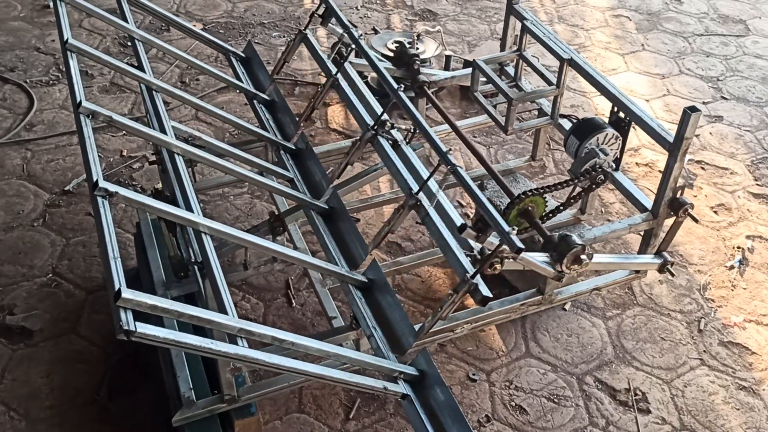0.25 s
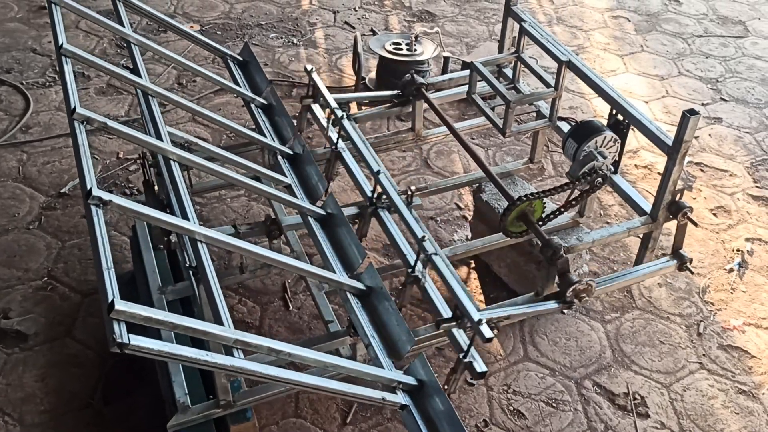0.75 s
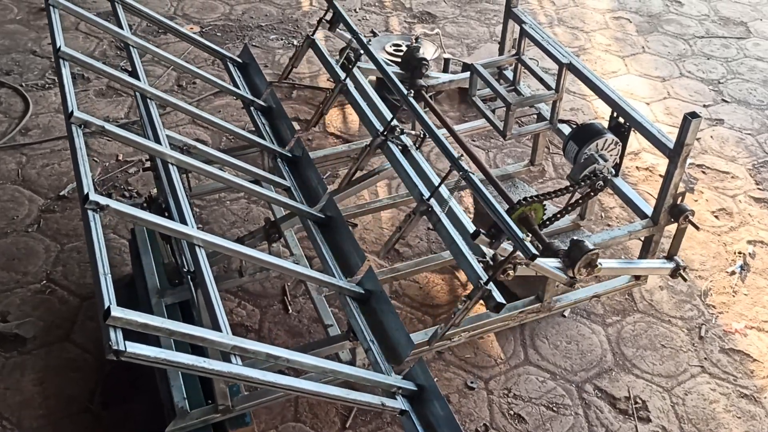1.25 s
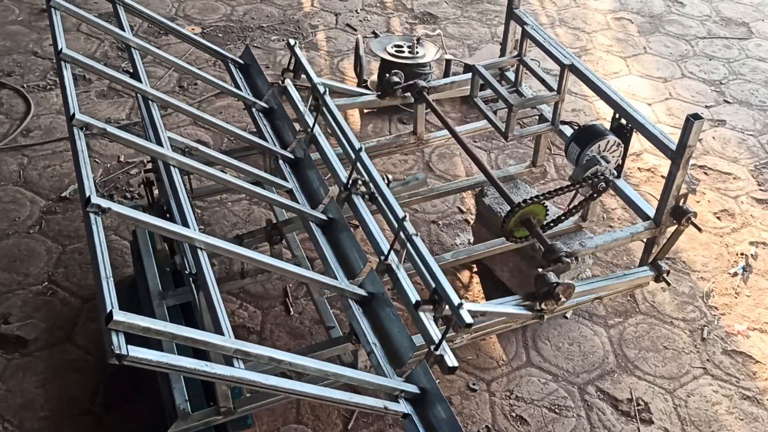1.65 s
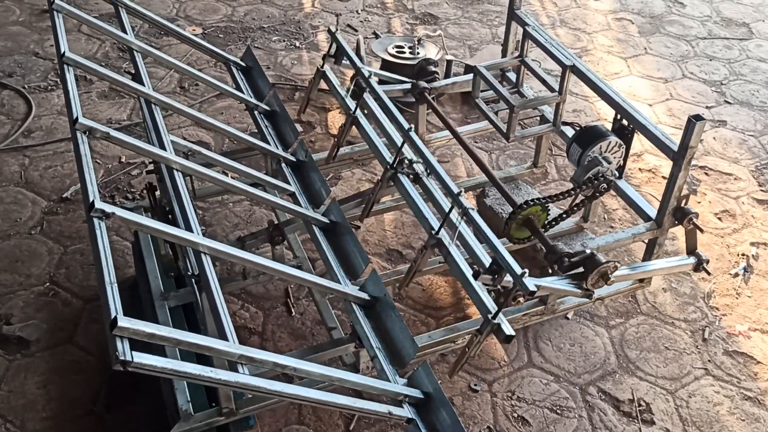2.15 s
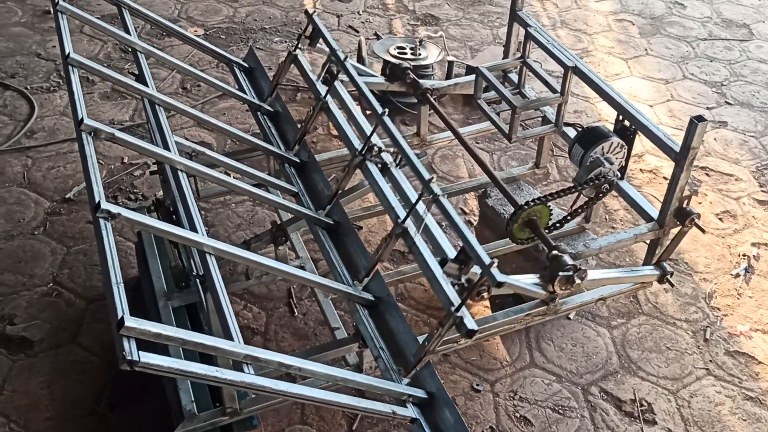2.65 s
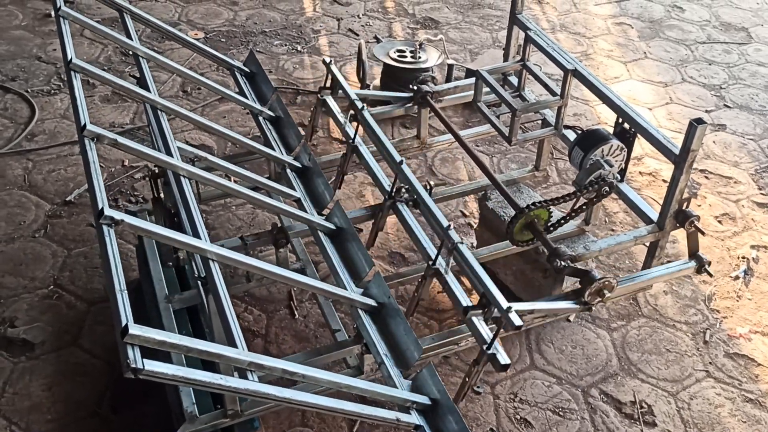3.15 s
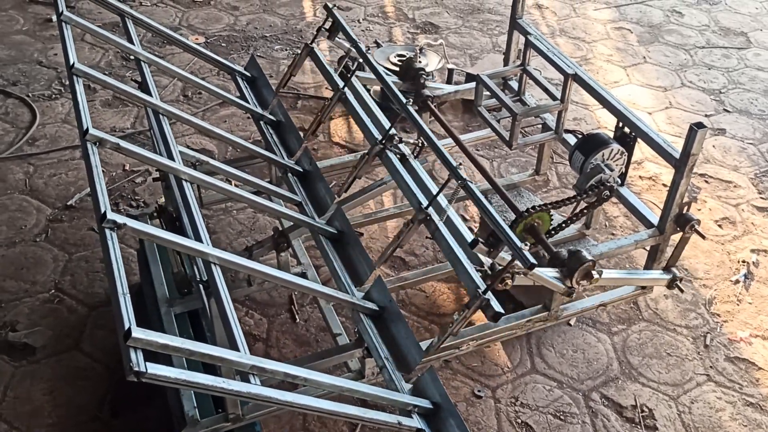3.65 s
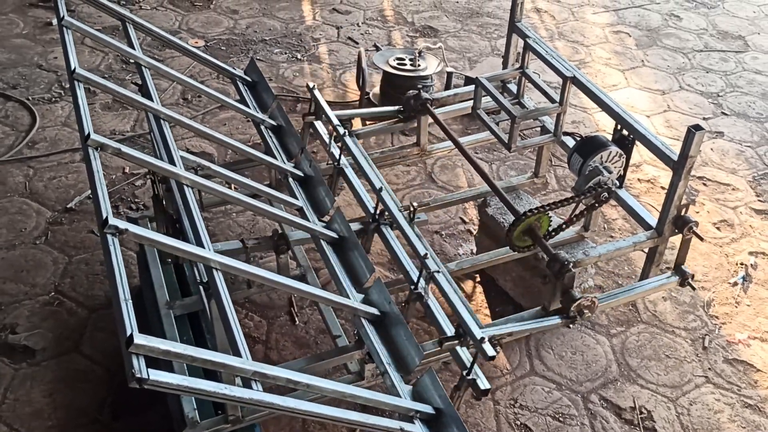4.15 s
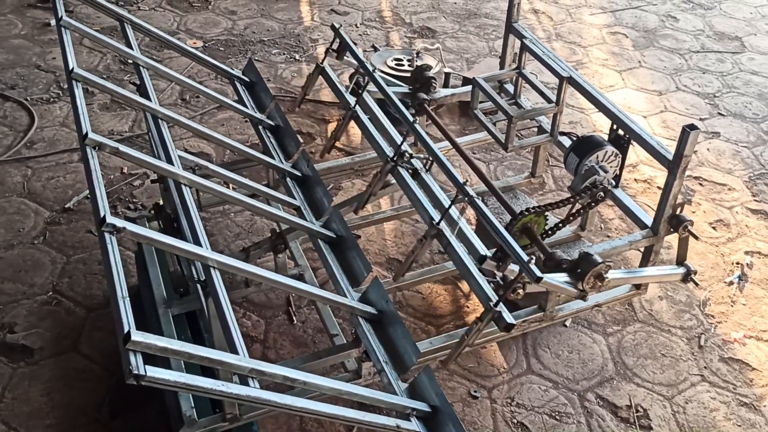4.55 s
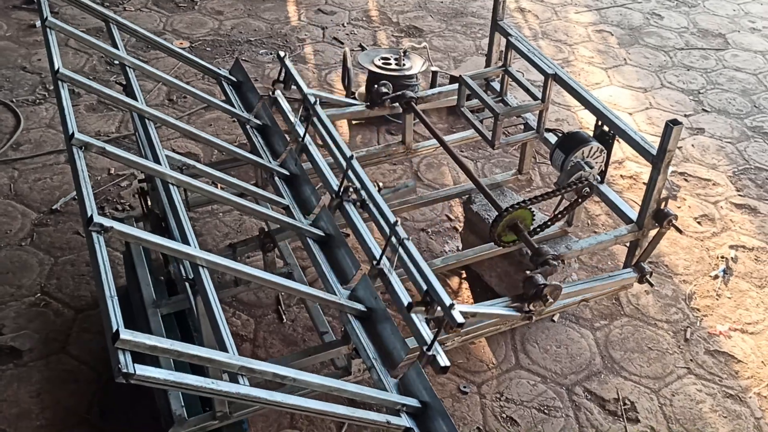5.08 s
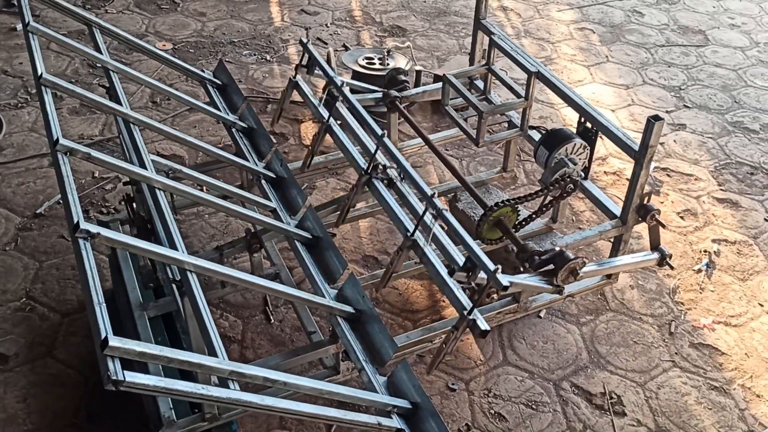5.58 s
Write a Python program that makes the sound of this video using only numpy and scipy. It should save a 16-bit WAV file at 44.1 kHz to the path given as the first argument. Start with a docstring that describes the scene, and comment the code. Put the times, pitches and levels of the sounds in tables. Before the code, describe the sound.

A homemade steel-tube machine runs in a yard, heard close in wide stereo with little echo, bright but without the very highest treble. The stretch opens on quiet working noise: faint motor whirr and hum, chain ticks, and a dull linkage knock near 0.1 s. At about 0.5 s the carriage slams into the frame, a chattering clank with two fast rebounds and ringing bars; at 0.75 s it drops back with a hard knock and weakening, jingling bounces. The pair repeats at about 1.65 and 1.9, 2.8 and 3.05, 3.95 and 4.2, 5.1 and 5.35 s, slightly varied. Around each drop the chain rattles and a rail rubs; afterwards a thin, rough squeak sinks in pitch while slowing chain ticks follow. Two soft linkage knocks come near 1.25, 2.4, 3.5, 4.7 and 5.8 s. Small stray clinks and occasional shudders keep it loose and uneven.

```python
"""A steel-tube carriage clanks against the frame of a homemade planting machine, once a turn, in a yard.
A motor and chain crank it to and fro; each time it then drops back with a jingling rattle.
Loose joints clink and knock, the chain ticks over its sprocket, a pivot squeaks, a rail rubs, a motor hums faintly.
Blows are sprays of tiny contacts that excite coloured, dying noise and clear, wavering tones.
The chain is bunched clicks, the squeak a rough gliding tone, the rub and the motor's whirr coloured noise."""
import sys
import numpy as np
from scipy import signal
from scipy.fft import rfft, irfft
from scipy.io import wavfile

SR = 44100
rng = np.random.default_rng(int(sys.argv[2]) if len(sys.argv) > 2 else 0)


def bounce(signal):
    """Save signal as a 16-bit WAV file at the path given by the first command-line argument."""
    frames = np.transpose(np.atleast_2d(signal))
    limited = np.clip(frames, -1, 1)
    pcm = np.round(limited * 32767).astype(np.int16)
    wavfile.write(sys.argv[1], SR, pcm)


N = 256662
TIME = np.arange(N) / SR
RING_TIME = TIME[:SR]  # every ring lasts at most one second

# how alike the two microphones hear each pitch: (pitch_hz, left_right_correlation [-1 to 1])
LIKENESS = [(40, 0.2), (120, .93), (400, 0.86), (1000, .5), (1550, 0.12), (2150, 0), (2800, -0.04),
            (3600, 0.24), (4300, 0), (14000, 0.11)]
# tone colour of the chain's many weak resonances: (pitch_hz, relative_level_db)
CHAIN_COLOUR = [(200, -11), (1000, -12), (1750, -4), (2600, -5.5), (3750, -4), (4600, -3.5), (5500, -6.5),
                (6500, -0.5), (7050, 0), (7420, 8), (7850, 0), (8400, 3), (12000, -13.5), (16000, -20)]


def from_db(db):
    """Turn decibels into gain."""
    return 10 ** (np.asarray(db) / 20)


def rms_one(x):
    """Scale a signal to an rms (average strength) of 1."""
    return x / np.sqrt(np.mean(x ** 2) + 1e-20)


def at_hz(points, hz):
    """Read a table between its points, on a log-frequency axis."""
    freq, value = np.transpose(points)
    return np.interp(np.log(np.maximum(hz, 1)), np.log(freq), value)


def drift(rate_hz):
    """Random wander with an rms of 1; a higher rate makes it quicker."""
    coarse = TIME[::64]
    hz = np.fft.rfftfreq(len(coarse), coarse[1])
    spectrum = rfft(rng.standard_normal(len(coarse)))
    slow = irfft(spectrum / (1 + (hz / rate_hz) ** 2), len(coarse))
    return np.interp(TIME, coarse, rms_one(slow))


def noise(colour, size):
    """Coloured noise as two microphones hear it: mostly alike in the bass, nearly unrelated in the treble."""
    hz = np.fft.rfftfreq(size, 1 / SR)
    mid, side = np.exp(2j * np.pi * rng.random((2, len(hz))))
    alike = np.clip(at_hz(LIKENESS, hz), -1, 1)
    pair = np.sqrt(1 + alike) * mid + np.sqrt(1 - alike) * side * [[1], [-1]]
    return rms_one(irfft(pair * from_db(at_hz(colour, hz)), size))


def dying(t60):
    """Envelope that falls 60 dB in t60 seconds."""
    return np.exp(-np.log(1000) * RING_TIME / t60)


def crowd(colour, t60, crack_db, crack_t60):
    """Response of countless close modes (resonances): a short crack and a longer dense ring."""
    envelope = dying(t60) + from_db(crack_db) * dying(crack_t60)
    return noise(colour, size=SR) * envelope


def chatter(length_s, chatter_db):
    """One contact, then a dying spray of tiny rebounds, scaled to unit energy."""
    t = TIME[:SR // 5]
    contacts = rng.random(len(t)) < 900 / SR  # 900 a second on average
    spray = rng.standard_normal(len(t)) * contacts * np.exp(-t / max(length_s, .002))
    force = from_db(chatter_db) * spray / np.sqrt(np.sum(spray ** 2) + 1e-12)
    force[0] = 1
    return force / np.sqrt(np.sum(force ** 2))


def add(out, start_s, sound):
    """Mix a sound in at its start time."""
    at = max(round(start_s * SR), 0)
    out[:, at:at + sound.shape[1]] += sound[:, :N - at]


def blows(events, colour, t60, crack_db, crack_t60, chatter_db):
    """Chattering blows excite a steel part's crowd of modes; part of its ring is the same every time."""
    same = .55  # share of the ring's energy that every blow has in common
    usual = crowd(colour, t60, crack_db, crack_t60)
    out = np.zeros((2, N))
    for start_s, level_db, chatter_s in events:
        fresh = crowd(colour, t60, crack_db, crack_t60)
        response = np.sqrt(same) * usual + np.sqrt(1 - same) * fresh
        force = chatter(chatter_s, chatter_db)
        sound = signal.fftconvolve(response, force[None], axes=1)[:, :SR]
        add(out, start_s, from_db(level_db) * sound)
    return out


def ring(events, modes, swell_s, looseness, flutter_db):
    """Clear modes store each blow's energy; rattling joints shake phase and strength, low modes least."""
    start_s, level_db, _ = np.transpose(events)
    energy_in, out = np.zeros(N), np.zeros((2, N))
    at = np.clip(np.round(start_s * SR).astype(int), 0, N - 1)
    energy_in[at] = from_db(level_db) ** 2
    rise = np.exp(-1 / (swell_s * SR))
    sway = drift(3.7)  # as the parts move, the phase between the microphones wanders
    for hz, mode_db, t60 in modes:
        energy = signal.lfilter([1], [1, -dying(t60)[1] ** 2], energy_in + 1e-18)
        strength = signal.lfilter([1 - rise], [1, -rise], np.sqrt(energy))
        shaken = np.tanh(drift(32)) * min(np.sqrt(hz / 1000), 1)
        swing = strength * from_db(mode_db + flutter_db * shaken)
        # looseness is the phase shake in radians at 1000 Hz
        phase = 2 * np.pi * hz * TIME + looseness * np.sqrt(hz / 1000) * drift(30)
        apart = np.arccos(np.clip(at_hz(LIKENESS, hz), -1, 1)) * sway * rng.choice([-1, 1])
        out += swing * np.sin(phase + apart * [[.5], [-.5]])
    return out


def each_turn(times, contacts):
    """Play a run of contacts from each time, varied a little: rows (start_s, level_db, chatter_s)."""
    scatter_db, scatter_share = 0.6, .012  # spread of the level, and of the delay as a share of itself
    delay_s, level_db, chatter_s = np.transpose(contacts)
    chance = rng.standard_normal((len(times), 2, len(delay_s)))
    runs = []
    for start_s, (late, hard) in zip(times, chance):
        when_s = start_s + delay_s * (1 + scatter_share * late)
        runs.append(np.column_stack([when_s, level_db + scatter_db * hard, chatter_s]))
    rows = np.vstack(runs)
    return rows[(rows[:, 0] >= 0) & (rows[:, 0] < TIME[-1])]


def slowing_run(first_db, loss_db, gap_s, growth_s, chatter_s, count):
    """Contacts ever weaker, their gaps widening by growth_s: rows (delay_s, level_db, chatter_s)."""
    return [(k * gap_s + k * (k - 1) / 2 * growth_s, first_db - k * loss_db, chatter_s) for k in range(count)]


def swells(into_turn, rows):
    """Level in dB of a part that swells and fades at set places in the turn."""
    gain = sum(from_db(db) * np.exp(-((into_turn - middle) / width) ** 2) for middle, width, db in rows)
    return 20 * np.log10(gain + 1e-6)


def push(times):
    """The carriage slams into the frame; blows ring the frame, and the long bars swell a moment later."""
    # a slam and two rebounds: (delay_s, relative_level_db, chatter_s)
    push_contacts = [(0, -3.7, .014), (.018, -9, .014), (.046, -7.3, .023)]
    # the frame's crowd of weaker modes: (pitch_hz, relative_level_db)
    frame_colour = [(40, -66), (110, -19.5), (480, -9.5), (800, -4.5), (1100, 0), (1700, 1), (2400, -3),
                    (3900, 2), (5600, -2.5), (6600, 4.5), (8300, 0.5), (12000, -14.5), (16000, -17)]
    # clear modes of the frame: (pitch_hz, relative_level_db, t60_s)
    frame_modes = [(112, -15, .5), (298, -15, .4), (565, -12, .5), (785, -9, .4), (958, -3.5, .48),
                   (1103, -7, .4), (1260, -3, .42), (1295, -6, .4), (1610, -6, .4), (1672, -1, .38),
                   (2116, 0, .34), (2150, -7, .33), (3543, 5, .27), (5199, -4, .35), (6187, -2, .4),
                   (6845, -2, .4), (7251, -2, .4)]
    # long bars that take up the push and sing on: (pitch_hz, relative_level_db, t60_s)
    bar_modes = [(4431, 0, .45), (4480, -6, .4), (4525, -3, .45), (4600, 0, .5)]
    hits = each_turn(times, push_contacts)
    clank = blows(hits, frame_colour, t60=0.47, crack_db=2.5, crack_t60=0.059, chatter_db=0)
    frame = ring(hits, frame_modes, swell_s=.004, looseness=0.75, flutter_db=6.0)
    bars = ring(hits, bar_modes, swell_s=0.014, looseness=0.45, flutter_db=7.0)
    return from_db(-12.3) * clank + from_db(-25) * frame + from_db(-22.7) * bars


def drop(times, losses_db):
    """The carriage knocks hard on its end stop, then rings through ever weaker bounces."""
    # in some turns it shudders as it settles: (start_s, relative_level_db, chatter_s)
    shudders = [(0.878, -19, .05), (2.032, -20.5, .012), (3.124, -18.5, .012), (3.212, -22, .009),
                (5.449, -17, .07)]
    # hard knock of the end stop: (pitch_hz, relative_level_db)
    stop_colour = [(150, -20), (320, 1), (600, -45), (1700, -20), (2080, 19), (2330, -2), (2650, 16.5),
                   (3200, -20), (8000, -10)]
    # the carriage's crowd of weaker modes: (pitch_hz, relative_level_db)
    carriage_colour = [(40, -51), (110, -14.5), (320, -9), (550, -11.5), (1100, 0), (1700, -0.5),
                       (3100, -0.5), (3750, -0.5), (4200, -1), (5500, -1.5), (6700, 6), (8300, -1.5),
                       (12000, -18), (16000, -18.5)]
    # clear modes of the carriage: (pitch_hz, relative_level_db, t60_s)
    carriage_modes = [(120, -17, .7), (260, -17, .3), (322, -5, .4), (705, -11, .5), (1190, -9, .5),
                      (1715, -1, .5), (3590, -5, .55), (3663, -1, .65), (3743, -2, .65), (3840, -8, .7),
                      (4600, -4, .5)]
    drop_db = -11.5  # before each layer's own gain
    landings = each_turn(times, [(0, drop_db, .008)])
    runs = []
    for start_s, loss_db in zip(times, losses_db):
        bounces = slowing_run(drop_db, loss_db, gap_s=.038, growth_s=.008, chatter_s=.04, count=3)
        runs.append(each_turn([start_s], bounces))
    hits = np.vstack(runs + [shudders])
    knock = blows(landings, stop_colour, t60=0.13, crack_db=-14, crack_t60=0.016, chatter_db=-5.5)
    clank = blows(hits, carriage_colour, t60=0.44, crack_db=-6, crack_t60=0.046, chatter_db=3)
    singing = ring(hits, carriage_modes, swell_s=0.0035, looseness=1.1, flutter_db=9.5)
    return from_db(-5.5) * knock + from_db(-3.9) * clank + from_db(-19) * singing


def joints(drop_times, slack_times, knocks_db):
    """Small steel links clink brightly; the linkage knocks twice, duller, as it takes up its slack."""
    # links stir just before each landing and jingle after it: (delay_s, relative_level_db, chatter_s)
    jingle = [(-.006, -19, .006), (.008, -8, .01), (.017, -12, .012)]
    # a loose link falls over between push and drop: (start_s, relative_level_db, chatter_s)
    stray_clinks = [(0.6725, -11, .004), (1.857, -15, .006), (1.864, -12, .005), (2.902, -17, .003),
                    (4.0454, -16, .007), (5.248, -12.5, .014)]
    # crowd of modes of the small links: (pitch_hz, relative_level_db)
    link_colour = [(100, -38), (1500, -13.5), (3000, -19), (4300, -10.5), (5700, -12.5), (6400, 5.5),
                   (7400, 0), (8400, -1.5), (12000, -17), (13700, -9), (16000, -30)]
    # clear modes of the small links: (pitch_hz, relative_level_db, t60_s)
    link_modes = [(6303, 0, .3), (6365, -1, .3), (6640, -2, .25), (6805, 1, .3), (7251, -2, .3),
                  (7545, -1, .35), (8100, -4, .25)]
    # crowd of modes of the linkage: (pitch_hz, relative_level_db)
    linkage_colour = [(50, -20), (200, -17.5), (500, -1), (850, 1.5), (1700, 5), (2500, -10), (3700, 4),
                      (5500, -12), (7000, 7.5), (15000, -100)]
    links = np.vstack([each_turn(drop_times, jingle), stray_clinks])
    runs = []
    for start_s, knock_db in zip(slack_times, knocks_db):
        pair = slowing_run(knock_db, loss_db=5, gap_s=.083, growth_s=0, chatter_s=.014, count=2)
        runs.append(each_turn([start_s], pair))
    slack = np.vstack(runs)
    clinks = blows(links, link_colour, t60=0.32, crack_db=9.5, crack_t60=0.068, chatter_db=3.5)
    singing = ring(links, link_modes, swell_s=.001, looseness=.6, flutter_db=4)
    knocks = blows(slack, linkage_colour, t60=0.5, crack_db=-1.5, crack_t60=0.032, chatter_db=1)
    return from_db(-12) * clinks + from_db(-27) * singing + from_db(-7.5) * knocks


def chain_ticks(starts):
    """The loaded chain ticks over the teeth, slowing on the return stroke; now and then it snaps taut."""
    # sharp ticks as slack is taken up: (start_s, relative_level_db, chatter_s)
    snap_events = [(0.108, -22.5, .004), (0.2513, -27, .003), (1.115, -19, .004), (1.386, -24.5, .002),
                   (1.446, -30, .005), (3.511, -21.5, .004), (4.557, -24.5, .004), (4.685, -23, .004),
                   (4.821, -25, .004), (4.885, -27, .004)]
    run = slowing_run(first_db=-22.5, loss_db=.7, gap_s=.051, growth_s=.0038, chatter_s=.004, count=6)
    teeth = np.array(run)
    teeth[::2, 1] -= 2.5  # inner links are softer than outer ones, in dB
    return_strokes = starts + .452
    ticks = np.vstack([each_turn(return_strokes, teeth), snap_events])
    sound = blows(ticks, CHAIN_COLOUR, t60=0.25, crack_db=6.5, crack_t60=0.03, chatter_db=0)
    return from_db(-11.5) * sound


def chain_rattle(into_turn, bunching, contacts_per_s):
    """Rollers rattle in a bunch each time a link seats on the sprocket, eighteen links a second."""
    # where in the turn the chain is heard: (middle_s, half_width_s, level_db)
    chain_swells = [(.35, .06, -31), (.53, .06, -40), (.71, .06, -32.5), (1.02, .09, -41.5)]
    link = 18 * into_turn - .22
    seating = np.exp(bunching * np.cos(2 * np.pi * link))
    clicks = rng.uniform(-1.14, 1, N) * (rng.random(N) < contacts_per_s / SR)
    force = rms_one(clicks * seating) * from_db(swells(into_turn, chain_swells))
    body = crowd(CHAIN_COLOUR, t60=0.11, crack_db=5.5, crack_t60=0.0092)
    body = body / np.sqrt(np.sum(body ** 2) / 2)  # unit energy per side, on average
    return signal.fftconvolve(force[None], body, axes=1)[:, :N]


def squeak(into_turn, waver_hz, octave_below_db):
    """A dry pivot sings a thin, rough, sinking note; uneven slips add the octave below."""
    # the note sinks as the pivot slows: (into_turn_s, pitch_hz)
    squeak_pitch = [(.5, 7530), (.6, 7240), (.68, 7110), (.76, 6850)]
    # where in the turn the pivot sings: (middle_s, half_width_s, relative_level_db)
    squeak_swells = [(.635, .06, -34)]
    hz = np.interp(into_turn, *np.transpose(squeak_pitch)) + waver_hz * drift(90.3)
    phase = 2 * np.pi * np.cumsum(hz) / SR
    sides = []
    for side in range(2):
        note = drift(70) * np.sin(phase) + drift(70) * np.cos(phase)
        octave_below = drift(110) * np.sin(phase / 2 + 3 * drift(40))
        sides.append(note + from_db(octave_below_db) * octave_below)
    return from_db(swells(into_turn, squeak_swells)) * np.array(sides)


def rub(into_turn, flutter_db):
    """A rail rubs at set places in the turn: coloured noise with a fluttering level."""
    # tone colour of the rubbing: (pitch_hz, relative_level_db)
    rub_colour = [(500, -11.5), (2400, -12), (3400, -2.5), (4250, -0.5), (5300, -8.5), (6500, -1.5),
                  (8000, -4.5), (14000, -41)]
    # where in the turn the rail rubs: (middle_s, half_width_s, level_db before the flutter)
    rub_swells = [(.3, .075, -30), (.6, .1, -44), (1.03, .045, -38.5)]
    level_db = swells(into_turn, rub_swells) + flutter_db * drift(50)
    return noise(rub_colour, size=N) * from_db(level_db)


def motor(whirr_db, flutter_db, hum_db):
    """Motor and gears: a noisy whirr with a fine flutter, and a few wavering tones."""
    # tone colour of the whirr: (pitch_hz, relative_level_db)
    motor_colour = [(30, -33), (70, -5), (130, -3), (345, 1), (473, -5), (700, -2), (1700, -5), (2400, -9),
                    (3700, -5.5), (4500, -8), (5500, -20.5), (6550, -2), (8400, -21), (12000, -23),
                    (16000, -36)]
    # faint wavering tones of motor and gearing: (pitch_hz, relative_level_db)
    motor_tones = [(75, -74), (118, -61.5), (156, -62), (689, -64), (834, -61.5)]
    whirr = noise(motor_colour, size=N) * from_db(whirr_db + flutter_db * drift(31))
    hum = np.zeros(N)
    for hz, tone_db in motor_tones:
        strength = from_db(tone_db + 2 * drift(2))
        hum += strength * np.sin(2 * np.pi * hz * TIME + 2 * drift(2))
    return whirr + from_db(hum_db) * hum


def scene():
    """The crank's position drives chain, pivot and rail; the blows fall on top."""
    # turns of the crank: (carriage_meets_frame_s, drops_back_s, loss_per_bounce_db,
    # linkage_takes_up_slack_s, slack_knock_relative_level_db)
    turns = [(-0.635, -0.39, 4, 0.104, -22.5), (0.508, 0.756, 4.6, 1.247, -26.5),
             (1.645, 1.892, 4.2, 2.388, -26), (2.795, 3.042, 2.7, 3.509, -24.5),
             (3.938, 4.186, 4.4, 4.68, -24), (5.081, 5.325, 3.0, 5.8, -25.5)]
    starts, drop_times, losses_db, slack_times, knocks_db = np.transpose(turns)
    into_turn = TIME - starts[np.searchsorted(starts, TIME) - 1]  # seconds since the latest push
    steel = push(starts) + drop(drop_times, losses_db) + joints(drop_times, slack_times, knocks_db)
    chain = chain_ticks(starts) + chain_rattle(into_turn, bunching=0.27, contacts_per_s=450)
    pivot = squeak(into_turn, waver_hz=99.9, octave_below_db=-8)
    rail = rub(into_turn, flutter_db=2.5)
    return steel + chain + pivot + rail + motor(whirr_db=-44, flutter_db=1.76, hum_db=4.5)


def record(dry):
    """Left and right differ in colour, both with a deep notch near 10 kHz; bass and top cut, peaks rounded."""
    # deep notch near 10 kHz, the same in both channels: (pitch_hz, level_db)
    notch = [(8480, 0), (8620, -16), (9000, -24), (9350, -42), (10000, -55), (11350, -55), (11620, 0)]
    # colour difference of the two channels: (pitch_hz, left_minus_right_db)
    balance_db = [(300, 0.5), (900, -0.6), (1700, 3), (2600, 1.5), (3400, -2), (4900, -5), (6000, 5.5),
                  (6500, -3), (7200, 4.5), (8200, 1.5), (11000, 2.5), (14000, 2.5)]
    hz = np.fft.rfftfreq(N + SR, 1 / SR)
    colour = from_db(at_hz(notch, hz) + at_hz(balance_db, hz) * [[.5], [-.5]])
    heard = irfft(rfft(dry, N + SR) * colour, N + SR)[:, :N]
    bass_cut = signal.butter(2, 65, "high", fs=SR, output="sos")
    heard = signal.sosfilt(bass_cut, heard)
    rounded = .95 * np.tanh(heard / .95)
    top_cut = signal.ellip(10, .1, 80, 15750, fs=SR, output="sos")  # steep cut above 15750 Hz
    return signal.sosfilt(top_cut, rounded)


dry = scene()
out = record(dry)
bounce(out)
```